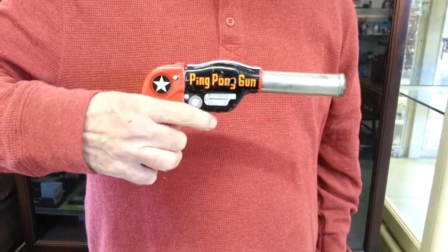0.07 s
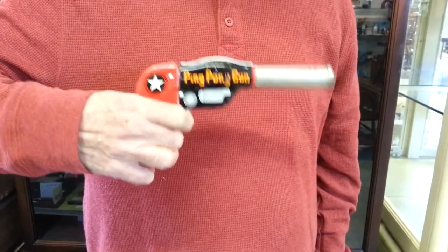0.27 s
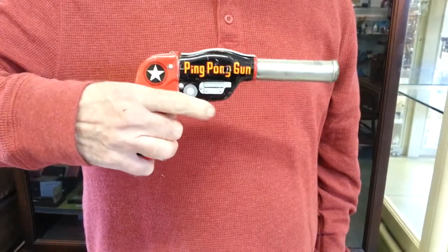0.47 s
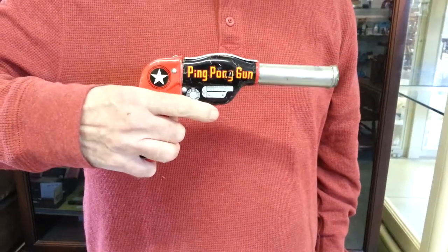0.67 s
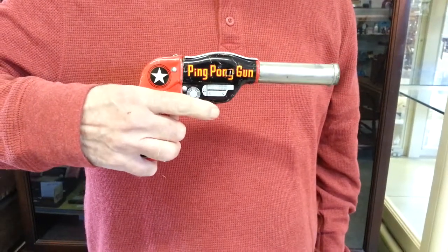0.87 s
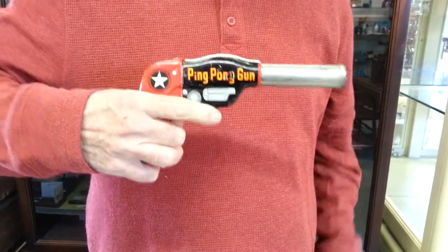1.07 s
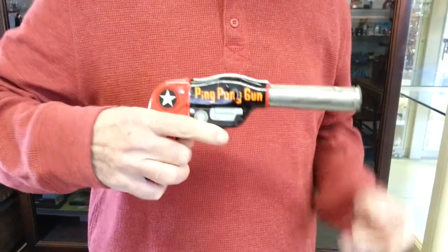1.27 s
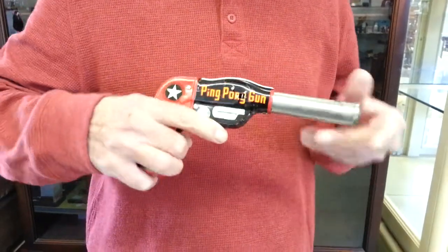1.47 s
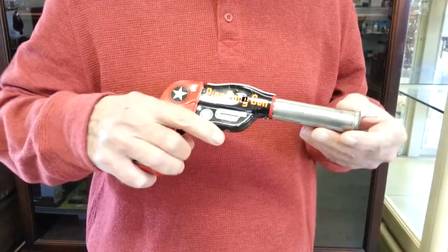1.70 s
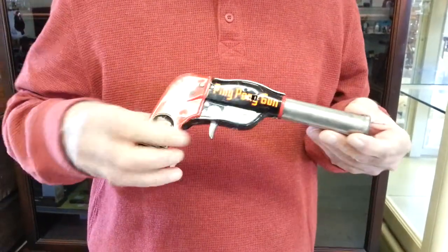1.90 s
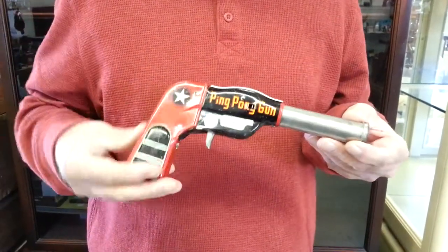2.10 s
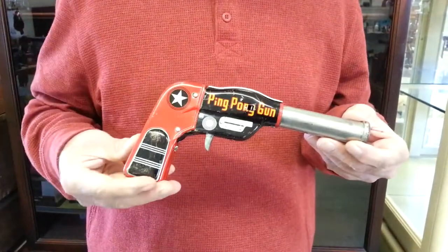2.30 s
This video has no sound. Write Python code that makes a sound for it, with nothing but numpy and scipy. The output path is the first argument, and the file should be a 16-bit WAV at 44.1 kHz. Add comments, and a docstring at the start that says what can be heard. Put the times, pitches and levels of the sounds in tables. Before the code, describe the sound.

A tin toy gun fires close to the microphone at about 0.2 seconds: a brief trigger scrape, then one loud, slightly overloaded snap and pop. Its spring rattles and rings thinly, fading with the room's echo. A sharp click follows at 0.4 seconds, two faint dry ticks around 1.0 and 1.1, and light handling clicks from 1.5 to 2. Soft ventilation hums throughout.

```python
"""Indoors, one microphone close to a tin spring gun that fires a table-tennis ball; ventilation hums behind.
A faint click, then the trigger scrapes, the catch slips, the plunger slams home and the air in the
barrel pops. The snap overloads the recorder and rings round the room while the spring rattles and
sings on. Then come clicks on the tin shell, and two dry ticks, perhaps the ball bouncing far off."""
import sys
import numpy as np
from scipy import signal
from scipy.fft import rfft, irfft, next_fast_len
from scipy.io import wavfile
from scipy.ndimage import uniform_filter1d

SR = 44100
rng = np.random.default_rng(int(sys.argv[2]) if len(sys.argv) > 2 else 0)


def generate_wav(sig):
    """Save sig (samples, or channels by samples) to the path in sys.argv[1] as 16-bit PCM at SR."""
    pcm = np.round(np.clip(np.atleast_2d(sig).T, -1, 1) * 32767).astype(np.int16)
    wavfile.write(sys.argv[1], SR, pcm)


N = 108045
T = np.arange(SR // 2) / SR  # time within one blow [s]


def amp(db):
    """Decibels to gain."""
    return 10 ** (np.asarray(db) / 20)


def unit(x):
    """Scaled to rms 1."""
    return x / np.sqrt(np.mean(x ** 2) + 1e-20)


def along(points, hz):
    """Reads a curve of (frequency, value) points on a log frequency axis."""
    freqs, values = np.transpose(points)
    return np.interp(np.log(hz + 1), np.log(freqs + 1), values)


def fade(t, t60):
    """Exponential decay, 60 dB down after t60 seconds."""
    return np.exp(-np.log(1000) * t / np.maximum(t60, 1e-4))


def filtered(x, response):
    """Filters x by a gain given as a function of frequency."""
    size = next_fast_len(len(x) + 8192)
    return irfft(rfft(x, size) * response(np.fft.rfftfreq(size, 1 / SR)), size)[:len(x)]


def noise(spectrum, size):
    """Coloured noise of rms 1."""
    return unit(filtered(rng.standard_normal(size), lambda hz: amp(along(spectrum, hz))))


def ring(modes, colour=lambda hz: 1, scatter=0):
    """Damped modes, a little different at each blow."""
    out = np.zeros(len(T))
    for hz, db, t60 in modes:
        envelope = colour(hz) * amp(db + rng.normal(0, 1)) * fade(T, t60)
        detuned_hz = hz * (1 + scatter * rng.normal())
        out += envelope * np.sin(2 * np.pi * (detuned_hz * T + rng.random()))
    return out


def add(track, s, sound):
    """Mixes a sound in at s seconds."""
    part = track[round(s * SR):][:len(sound)]
    part += sound[:len(part)]


# rush of the ventilation (frequency [Hz], level [dB])
VENT_SPECTRUM = [(20, -51), (45, -28.5), (75, -7), (115, -10.5), (190, -5.5), (240, -6.5), (340, -6.5),
                 (480, -8.5), (650, -11.5), (850, -9), (1150, -10), (1700, -12), (2400, -19), (3300, -22),
                 (4300, -22), (5700, -27.5), (8000, -26.5), (11000, -27), (14500, -27.5)]
# fan resonances (frequency [Hz], width [Hz], level [dB])
FAN_RESONANCES = [(91, 12, -62), (174, 10, -62), (820, 90, -59.5)]
def ventilation():
    """Room tone behind the gun: a soft rush of air with a few narrow fan resonances."""
    hum = np.zeros(N)
    for hz, width, db in FAN_RESONANCES:
        band = filtered(rng.standard_normal(N), lambda f: 1 / (1 + (2 * (f - hz) / width) ** 2))
        hum += amp(db) * unit(band)
    return amp(-48) * noise(VENT_SPECTRUM, N) + hum


# decay of the room's tail (frequency [Hz], t60 [s])
ROOM_T60 = [(170, 1.1), (450, 3.2), (800, 1.55), (2000, 0.98), (4000, 0.86), (7500, 0.74), (11000, 0.69),
            (15000, 0.42)]
# colour of that tail at the microphone (frequency [Hz], level [dB])
ROOM_COLOUR = [(100, 14.5), (400, 3.5), (700, -2), (1050, 0.5), (1500, -3), (2000, -3.5), (2700, 3),
               (3300, 1.5), (4000, 1.5), (6000, 0.5), (8000, -5), (14000, -4.5)]
def room(x, build_s=0.0067, early_delay_s=0.0055):
    """Quick echoes off the cabinets reach the microphone, then the long tail of the room."""
    hz, t, bands = signal.stft(rng.standard_normal(3 * SR // 2), SR, nperseg=256)
    envelope = fade(t, along(ROOM_T60, hz)[:, None]) * (1 - np.exp(-t / build_s))
    tail = signal.istft(bands * envelope, SR, nperseg=256)[1]
    response = amp(-10.5) * filtered(tail / np.linalg.norm(tail), lambda f: amp(along(ROOM_COLOUR, f)))
    early = rng.standard_normal(len(T)) ** 3 * fade(T, t60=0.12)  # cubed, so single echoes stand out
    add(response, early_delay_s, amp(-9.5) * early / np.linalg.norm(early))
    return signal.fftconvolve(x, response)[:N]


# clicks on the tin shell, and two dry ticks at 1.00 and 1.13 s (time [s], level [dB], bass [dB],
# low-mid [dB], mid [dB], treble [dB], contact t60 [s], ring time [factor])
CLICKS_AND_TICKS = [(0.0528, -36, -13, 14.5, 0.5, -15.5, .02, 0.77),
                    (0.2139, -25, -2, 1.5, 5, -2, 0.043, 0.73),
                    (0.2175, -31, 16.5, -14, -21, -7, 0.049, 0.67), (0.323, -36, 0, -17, -12, 0, .04, 1),
                    (0.401, -41, -3, -7, -8, -17, 0.055, 1.2), (0.415, -12.5, -1, 1, 1.5, 3, 0.042, 0.91),
                    (1.0032, -29, -11, -12, 0, -8, 0.014, 0.31), (1.127, -45, -10, -8, -10, 14, .02, 0.24),
                    (1.5603, -31, -12, 0, -1, -4, 0.039, 0.95), (1.5943, -50, -8, 6.5, 12, -11, .04, .8),
                    (1.6752, -42.5, -7, -0.5, -2, -6, 0.14, 1.2),
                    (1.7813, -38, -8, 0, 0, -2.5, 0.046, 0.74),
                    (1.791, -33.5, -10, -10, -11, -6, 0.035, 0.82),
                    (1.8938, -46.5, 15, 14, -5, -14, 0.056, 1), (1.9309, -28.5, 11, 8, 6, -1, 0.056, 1.01)]
# centres of the bass, low-mid, mid, neutral and treble bands (frequency [Hz])
CLICK_BANDS_HZ = [1100, 1750, 2550, 3800, 8170]
# modes of the shell (frequency [Hz], level [dB], t60 [s])
SHELL_MODES = [(1093, -7, 0.031), (1378, -12.5, 0.048), (1605, -6, .04), (1735, -2.5, .03),
               (2047, -8.5, 0.033), (2398, -6, 0.034), (3260, -10, .04), (3870, -9, .035),
               (4103, -2, 0.036), (4770, -10, .035), (6985, -8, .04), (7720, -17.5, 0.031)]
# contact noise (frequency [Hz], level [dB])
CONTACT_SPECTRUM = [(60, -34.5), (600, -13), (1200, -0.5), (4000, 2), (6000, -4), (8000, -4.5),
                    (10000, -14.5), (14000, -16)]
def clicks_and_ticks(attack_s=0.00078):
    """Close clicks on the shell, damped by the grip; two dry ticks, perhaps the ball bouncing far off."""
    out = np.zeros(N)
    rise = 1 - np.exp(-T / attack_s)
    for s, db, bass_db, low_mid_db, mid_db, treble_db, contact_t60, ring_factor in CLICKS_AND_TICKS:
        bands = list(zip(CLICK_BANDS_HZ, [bass_db, low_mid_db, mid_db, 0, treble_db]))
        colour = lambda hz: amp(along(bands, hz))  # set by the place of contact
        contact = filtered(noise(CONTACT_SPECTRUM, len(T)), colour) * fade(T, contact_t60)
        modes = [(hz, level, t60 * ring_factor) for hz, level, t60 in SHELL_MODES]
        ringing = ring(modes, colour, scatter=0.008)
        add(out, s, amp(db) * rise * (ringing + amp(-4) * contact))
    return out


# friction of the trigger on the catch (frequency [Hz], level [dB])
SCRAPE_SPECTRUM = [(300, -22), (900, -3), (2000, -3), (3000, -6), (4050, 4), (5500, -12), (7100, -2),
                   (9500, -17.5), (14000, -15.5)]
def trigger_scrape(start_s=0.188, slip_s=0.231, rise_db_per_s=352, rough_db=1.5):
    """The trigger's gritty drag swells until the catch slips."""
    t = np.arange(N) / SR
    grit = unit(uniform_filter1d(rng.standard_normal(N), size=60))
    swell = amp(-30.5 + rise_db_per_s * np.minimum(t - slip_s, 0) - rough_db * grit)
    return noise(SCRAPE_SPECTRUM, N) * swell * (t > start_s) * (t < slip_s)


# chatter of the coils on the barrel (frequency [Hz], level [dB])
RATTLE_SPECTRUM = [(200, -31.5), (700, -5.5), (1500, -5), (2800, -9.5), (4100, 1.5), (5500, -7), (7400, -3),
                   (9500, -4), (14000, -9.5)]
# when the plunger's slam sets the spring ringing, and its modes (frequency [Hz], level [dB], t60 [s])
SPRING_RING_START_S, SPRING_MODES = 0.241, [(4056, -24, 0.69), (4100, -30.5, 0.7)]
def spring_rattle(start_s=0.23, contacts_per_s=500):
    """Coils of the spring chatter on the barrel and settle, leaving a thin ring."""
    contacts = (rng.random(len(T)) < contacts_per_s / SR) * rng.uniform(0.5, 1, len(T))
    grains = unit(signal.fftconvolve(contacts, fade(T, t60=0.0068))[:len(T)])
    chatter = grains * noise(RATTLE_SPECTRUM, len(T)) * fade(T, t60=0.087)
    out = np.zeros(N)
    add(out, start_s, amp(-15) * chatter)
    add(out, SPRING_RING_START_S, ring(SPRING_MODES))
    return out


# blows of the firing stroke (time [s], level [dB], crack [dB], barrel ring [dB], crack t60 [s])
FIRING_BLOWS = [(.2311, -3, -4, 0, 0.066), (.2411, 1, 6, -13, 0.036), (0.2473, 0, -11.5, -1.5, 0.047),
                (0.262, -11.5, 6, -15, 0.043)]
# the plunger's crack (frequency [Hz], level [dB])
CRACK_SPECTRUM = [(40, -25.5), (200, -15), (400, -12), (620, -3), (850, 0), (1100, -1.5), (1600, 1.5),
                  (2800, -4.5), (4000, 4.5), (5800, -5.5), (7400, 4), (9500, -5), (14000, -5)]
# modes of the steel barrel (frequency [Hz], level [dB], t60 [s])
BARREL_MODES = [(1610, -13, 0.15), (1763, -20.5, 0.066), (2267, -14, .1), (2344, -10.5, 0.061),
                (3350, -12.5, .08), (3530, -13.5, .08), (3523, -9.5, .08), (3821, 2.5, 0.047),
                (4005, -10, 0.078), (4187, -9, 0.1), (6700, -22.5, 0.069), (7540, -19.5, 0.11)]
# puffs of air in the barrel (time [s], level [dB])
AIR_PUFFS = [(.2335, -17.5), (.2555, -15)]
# modes of its air column (frequency [Hz], level [dB], t60 [s])
AIR_MODES = [(654, -3, 0.063), (858, -1, .09), (933, 1, .05), (1020, -8, .04), (1400, -7.5, .08)]
def shot(attack_s=0.00019):
    """Close to the microphone, catch, plunger and rebounds crack and ring the barrel; its air pops."""
    out = np.zeros(N)
    rise = 1 - np.exp(-T / attack_s)
    ring_to_room = amp(-7)  # the ring reaches the room more weakly than the crack
    for s, db, crack_db, ring_db, t60 in FIRING_BLOWS:
        crack = amp(db + crack_db) * rise * noise(CRACK_SPECTRUM, len(T)) * fade(T, t60)
        barrel = amp(db + ring_db) * rise * ring(BARREL_MODES)
        add(out, s, crack + barrel)
        add(out, s, room(crack + ring_to_room * barrel))
    for s, db in AIR_PUFFS:
        puff = amp(db) * rise * ring(AIR_MODES)
        add(out, s, puff)
        add(out, s, room(ring_to_room * puff))
    return out


def scene():
    """At the microphone, in mono: the gun up close, the room around it, the ventilation behind."""
    mechanism = trigger_scrape() + spring_rattle()
    clicks = clicks_and_ticks()
    foreground = shot() + mechanism + clicks
    # the shell faces the microphone, so less of its sound goes into the room
    reverb = room(mechanism + amp(-2) * clicks)
    return (foreground + reverb + ventilation())[None]


def record(dry, ceiling_rms=0.79, release_db_per_s=39.5, clip_hardness=24, top_hz=14650):
    """The recorder ducks at the snap, the bass most, and recovers; peaks overload; the top is cut off."""
    x = dry[0]
    level = np.sqrt(np.abs(signal.lfilter(np.ones(256) / 256, 1, x ** 2)))  # running rms
    # the bass thins while the sound is loud
    bass_hz, duck_above_db, recover_s = 330, -29.5, 0.014
    pole = np.exp(-1 / (recover_s * SR))
    loudness = signal.lfilter([1 - pole], [1, -pole], level) / amp(duck_above_db)
    bass = filtered(x, lambda hz: 1 / (1 + (hz / bass_hz) ** 4))
    x = x - bass * loudness ** 2 / (1 + loudness ** 2)
    # the gain drops at once above the ceiling and climbs back steadily
    over_db = 20 * np.log10(np.maximum(level / ceiling_rms, 1))
    recovery_db = release_db_per_s * np.arange(N) / SR
    x = x * amp(recovery_db - np.maximum.accumulate(over_db + recovery_db))
    clipped = x / (1 + np.abs(x) ** clip_hardness) ** (1 / clip_hardness)
    return filtered(clipped, lambda hz: 1 / np.sqrt(1 + (hz / top_hz) ** 200))[None]


dry = scene()
out = record(dry)
generate_wav(out)
```